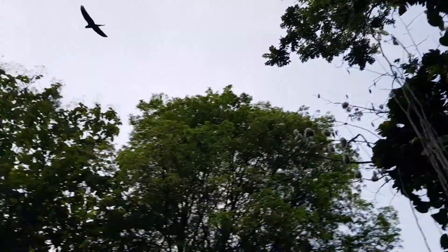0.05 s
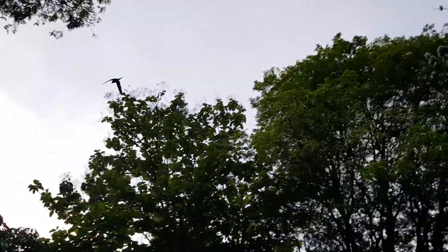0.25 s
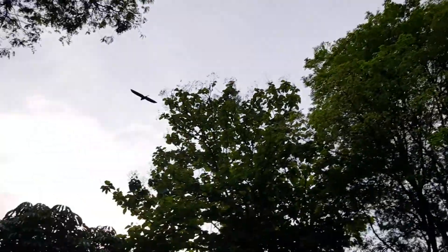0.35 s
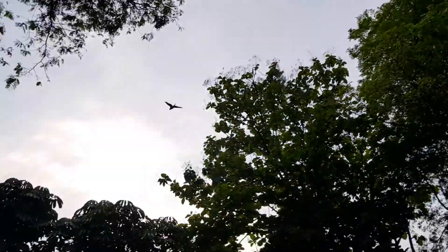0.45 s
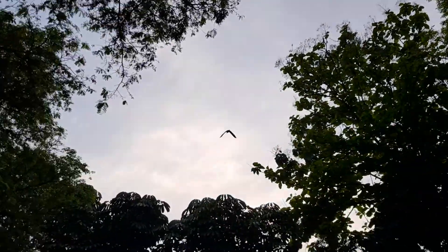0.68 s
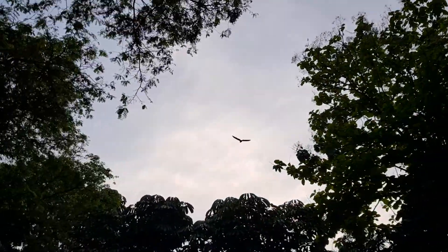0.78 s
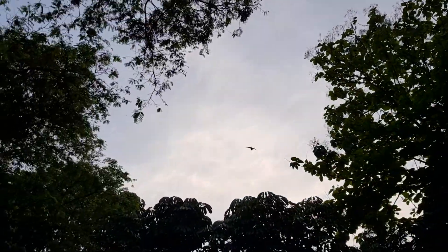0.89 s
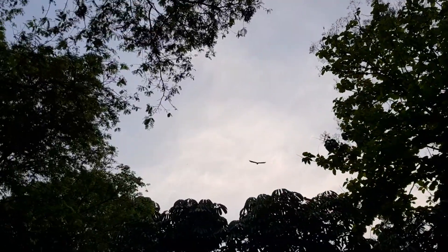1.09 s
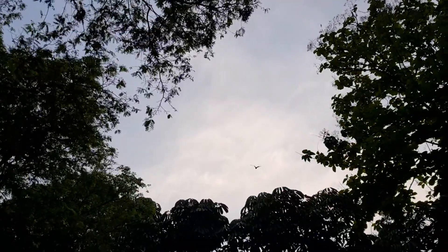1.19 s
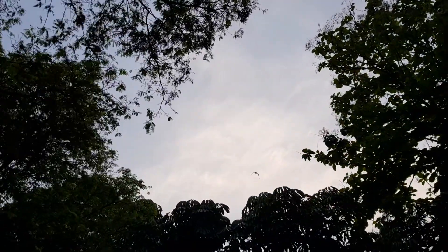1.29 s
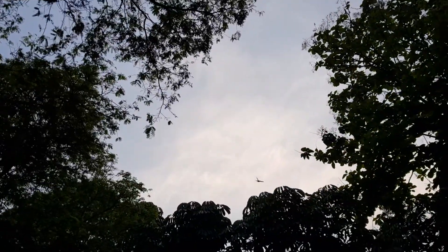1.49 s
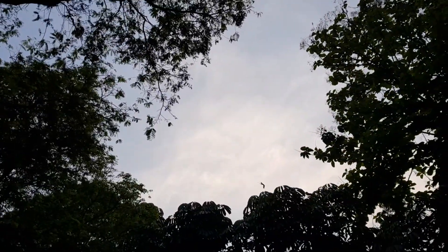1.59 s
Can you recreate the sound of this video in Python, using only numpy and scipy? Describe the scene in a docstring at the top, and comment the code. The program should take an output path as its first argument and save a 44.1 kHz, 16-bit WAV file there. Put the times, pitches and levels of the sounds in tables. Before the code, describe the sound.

A parrot gives one harsh, raspy squawk in flight, echoing off trees over a low drone.

```python
"""A parrot flying over a clearing gives one harsh squawk, a filtered harmonic voice scattered by the trees.
Its pitch arches up and down; in mid call the voice breaks into a fast flutter with side tones and rasp.
Behind it: a low motor-like drone of two sines, rumble and air of coloured noise, a buzzing insect of
rapid downward chirps, swells of noise hiss, faint far birds of blurred glides and two ticks of ringing modes."""
import sys
import numpy as np
from scipy import signal
from scipy.fft import rfft, irfft
from scipy.io import wavfile
from scipy.ndimage import uniform_filter1d

SR = 44100
rng = np.random.default_rng(int(sys.argv[2]) if len(sys.argv) > 2 else 0)


def pcm_store(signal):
    """Save signal as 16-bit PCM."""
    levels = np.round(np.clip(np.atleast_2d(signal), -1, 1) * 32767)
    wavfile.write(sys.argv[1], SR, levels.astype(np.int16).T)


N = 72765
TIME = np.arange(N) / SR  # s
BINS_HZ = np.fft.rfftfreq(N, 1 / SR)


def from_db(db):
    """Amplitude gain is ten to the power of a twentieth of the decibels."""
    return 10 ** (np.asarray(db) / 20)


def rms_one(x):
    """Normalisation by the root mean square gives unit effective amplitude."""
    return x / np.sqrt(np.mean(x ** 2) + 1e-20)


def in_time(rows):
    """Linear interpolation carries each column of a curve to every sample."""
    s, *columns = np.transpose(rows)
    return [np.interp(TIME, s, column) for column in columns]


def at_hz(points, hz, axis=1):
    """Interpolation of one spectrum column along log frequency."""
    table = np.array(points)
    return np.interp(np.log(hz + 1), np.log(table[:, 0]), table[:, axis])


def colour(x, points, axis=1):
    """Zero-phase filtering: each frequency is multiplied by a smooth gain curve."""
    return irfft(rfft(x) * from_db(at_hz(points, BINS_HZ, axis)), N)


def drift(hz):
    """Low-passed noise is a smooth random motion up to about this rate, of unit rms."""
    spectrum = rfft(rng.standard_normal(N))
    return rms_one(irfft(spectrum / (1 + (BINS_HZ / hz) ** 4), N))


def pan(db):
    """Intensity panning: left gains and right loses this many dB."""
    return from_db(np.array([[1], [-1]]) * db)


def turn(hz):
    """Phase is the time integral of angular frequency."""
    return 2 * np.pi * np.cumsum(hz) / SR


def blurred_tone(hz, width_hz):
    """Multipath fading through the leaves: random quadrature amplitudes, different in each ear."""
    phase = turn(hz)

    def one_ear():
        return rms_one(drift(width_hz) * np.cos(phase) + drift(width_hz) * np.sin(phase))

    return np.array([one_ear(), one_ear()])


def rumble_and_air():
    """Diffuse-field coherence: noise shares more between the ears where their likeness is higher."""
    # steady background spectrum: f/Hz, density/dB per Hz (relative)
    spectrum = [(20, -10), (38, -35), (52, 4), (70, 1), (110, -2), (180, -3), (280, -8.5), (420, -9.5),
                (650, -19), (1000, -24), (2000, -25.5), (3000, -32), (4500, -29.5), (7000, -33.5),
                (9500, -31.5), (11000, -87), (16000, -63)]
    # overall level: t/s, level/dB
    level = [(0, -49.5), (.8, -47), (1.65, -48.5)]
    # left-right correlation: f/Hz, likeness/1
    likeness = [(50, 0.88), (130, 1), (300, 0.63), (600, 0.26), (1200, .1), (4000, 0.026), (15000, 0.25)]
    alike = np.clip(at_hz(likeness, BINS_HZ), -1, 1)
    mid, side = rfft(rng.standard_normal((2, N)))
    common = np.sqrt(1 + alike) * mid
    opposed = np.sqrt(1 - alike) * side * [[1], [-1]]
    noise = irfft(common + opposed, N)
    return rms_one(colour(noise, spectrum)) * from_db(in_time(level)[0])


def drone():
    """Harmonic series: a wavering fundamental and its octave share one phase."""
    # distant drone: t/s, fundamental level/dB, octave level/dB
    levels = [(0, -45.5, -70), (.15, -51, -52.5), (.45, -45.5, -62.5), (.6, -49.5, -46), (.71, -50, -65),
              (.82, -52.5, -44.5), (1.02, -47.5, -64), (1.17, -51, -50.5), (1.43, -49, -45.5),
              (1.65, -43.5, -53)]
    phase = turn(51 * (1 + .02 * drift(10)))  # fundamental near 51 Hz
    tone = np.zeros(N)
    for harmonic, db in enumerate(in_time(levels), 1):
        amplitude = np.sqrt(2) * from_db(db + 0.55 * drift(36))  # a sine's peak from its rms
        tone += amplitude * np.sin(harmonic * phase)
    return tone * pan(0.7)


def insect():
    """Periodic frequency and amplitude modulation: rapid chirps, each sweeping down, fuse to a buzz."""
    # t/s, level/dB
    level = [(0, -61.5), (.3, -62.5), (.7, -59), (1.1, -60), (1.45, -59.5), (1.65, -59)]
    rate_hz, centre_hz, sweep_hz, width_hz, depth = 91, 8557, 950, 420, 0.3
    stroke = np.cumsum(rate_hz * (1 + 0.015 * drift(13))) / SR % 1  # position in the chirp, 0-1
    tone = blurred_tone(centre_hz + sweep_hz * (.5 - stroke), width_hz)
    chirps = tone * (1 - depth * np.cos(2 * np.pi * stroke))
    return rms_one(chirps) * from_db(in_time(level)[0]) * pan(3.5)


def hiss():
    """Coloured noise under a slow envelope: a soft high hiss swells and sinks, mostly on the left."""
    # t/s, level/dB, left minus right/dB
    swells = [(0, -62.5, 0), (.11, -57, 1), (.19, -58, 6), (.4, -43, 3.5), (.47, -46.5, -0.5), (.7, -63, 2),
              (.776, -60, 8), (.81, -63.5, 6), (.87, -60.5, 14), (.98, -55.5, 10.5), (1.26, -67.5, 2.5),
              (1.365, -63.5, 11), (1.5, -70, 6), (1.6, -73, -2)]
    # f/Hz, density/dB per Hz (relative)
    spectrum = [(1000, -38), (3000, 6.5), (5000, 5.5), (7000, 1.5), (11500, 7), (15500, 3.5)]
    db, balance_db = in_time(swells)
    noise = rms_one(colour(rng.standard_normal((2, N)), spectrum))
    return noise * from_db(db) * pan(balance_db / 2)


def far_birds():
    """Frequency glides under half-sine envelopes, blurred by distance into faint notes."""
    # onset t/s, length/s, mid pitch f/Hz, fall/Hz (negative rises), blur width/Hz,
    # level at mid note/dB, left gain and right loss/dB
    calls = [(0.085, 0.045, 5500, -300, 220, -59, 1.5), (1.06, .16, 3890, 200, 298, -64.5, 0.5),
             (1.394, 0.15, 2310, 141, 50, -65.5, -1), (1.482, .135, 4900, 200.5, 403, -65, -1)]
    out = np.zeros((2, N))
    for s, length, hz, fall_hz, width_hz, db, pan_db in calls:
        along = np.clip((TIME - s) / length, 0, 1)
        note = blurred_tone(hz + fall_hz * (.5 - along), width_hz)
        out += note * np.sin(np.pi * along) * from_db(db) * pan(pan_db)
    return out


def parrot():
    """Source and filter: rough pitch kicks split the harmonics into side tones, throat and beak shape them."""
    # the voice's pitch: t/s, f/Hz
    pitch_curve = [(.21, 550), (.226, 800), (.24, 935), (.256, 1100), (.275, 1110), (.303, 1045),
                   (.322, 1055), (.342, 1095), (.36, 1015), (.382, 1015), (.42, 993), (.47, 960),
                   (.49, 925), (.515, 890), (.54, 755)]
    # its effort: t/s, level/dB
    effort = [(.21, -39.5), (.226, -28.5), (.25, -29.5), (.265, -26), (.3, -27.5), (.335, -23),
              (.36, -25.5), (.385, -25.5), (.43, -25), (.46, -28), (.52, -29.5), (.537, -27.5)]
    # how far the voice breaks: t/s, roughness/1 (0-1)
    roughness = [(.21, .3), (.245, .25), (.262, .04), (.3, .12), (.325, .95), (.36, .75), (.38, 1),
                 (.47, .95), (.495, .25), (.52, .15), (.54, .3)]
    # throat and beak: f/Hz, gain with beak half open/dB, gain wide open/dB (relative)
    throat = [(506, 0, -31), (790, -19, -14), (895, -11, -11), (1125, -4, -8.5), (1300, -5, -3.5),
              (1470, -8, -5), (1840, -10, -0.5), (1830, -5.5, -2.5), (2470, 8, 3), (2930, -3, -9),
              (3100, 7, -0.5), (3380, 4, -4.5), (3580, -10.5, -5), (4580, 1, 0.5), (5110, -4.5, -9),
              (7090, -19, -18), (8180, -27, -30), (11000, -29, -35), (15000, -46, -39)]
    start_s, end_s, attack_s, release_s = 0.2057, 0.5304, 0.007, 0.012
    opening_s, opened_s = .28, .36  # the beak opens wide between these times
    flutter_hz, wander, sharpness, kick_spread_db = 146, .015, 4, .7
    # at full roughness: mean pitch lift, loss of amplitude per unit kick, random pitch share and level
    lift_hz, kick_dip, jitter, shimmer_db = 73, .25, .009, 1.8
    pitch, rough = in_time(pitch_curve)[0], in_time(roughness)[0]

    # flutter: raising the wave to a power narrows each kick
    flutter = (1 + np.sin(turn(flutter_hz * (1 + wander * drift(82))))) / 2
    kick = flutter ** sharpness * from_db(kick_spread_db * drift(100))
    jittered_hz = pitch * (1 + jitter * np.sqrt(rough) * drift(300))
    phase = turn(jittered_hz + rough * lift_hz * kick / kick.mean())

    pulses = rms_one(sum(np.cos(k * phase) for k in range(1, 15)))
    rasp = from_db(-23) * (1 + np.cos(phase)) * rng.standard_normal(N)  # noise pulsing at the pitch
    shimmer = from_db(shimmer_db * np.sqrt(rough) * drift(184))
    source = (pulses + rasp) * (1 - kick_dip * rough * kick) * shimmer

    opening = np.clip((TIME - opening_s) / (opened_s - opening_s), 0, 1)
    half_open = colour(source, throat, axis=1)
    wide_open = colour(source, throat, axis=2)
    voice = (1 - opening) * half_open + opening * wide_open
    # level out the short-term rms, so that effort alone sets the loudness
    voice = voice / np.sqrt(uniform_filter1d(voice ** 2, size=900) + 1e-12)
    attack = np.clip((TIME - start_s) / attack_s, 0, 1)
    release = np.clip(1 - (TIME - end_s) / release_s, 0, 1)
    return voice * attack * release * from_db(in_time(effort)[0])


def scattered_paths(t60, per_s):
    """Exponential reverberant decay of random clumped echoes, rising over about 20 ms, of unit energy."""
    arrives = rng.random((2, N)) < per_s / SR
    clumps = from_db(1.5 * drift(37))
    paths = rng.standard_normal((2, N)) * arrives * clumps
    paths = paths * from_db(-60 * TIME / t60) * (1 - np.exp(-TIME / .02))
    return paths / np.sqrt(np.sum(paths ** 2, axis=1, keepdims=True) + 1e-20)


def clearing(call):
    """Convolution with an impulse response: close, near and far echoes join the direct call."""
    # scatter from the trees: f/Hz, near foliage gain/dB, far trees gain/dB
    scatter = [(696, -10, -12), (1070, -11.5, -14), (2050, -0.5, -7), (3170, -6, -16), (4820, 0, -12),
               (6900, -2, -10), (14000, -4, -33)]
    # the bird flies in from the right: t/s, lead of the right side/s
    right_lead = [(.22, .000132), (.39, .000108), (.53, .000068)]
    # how the two sides hear the call: f/Hz, left minus right/dB
    ear_balance = [(1100, -.5), (2200, -0.5), (3200, 2.5), (4300, -3), (6000, 0.5), (9000, 7.5)]
    echoes_per_s, return_delay_s = 1500, .35
    near = colour(scattered_paths(0.35, echoes_per_s), scatter, axis=1)
    far = colour(scattered_paths(1, echoes_per_s), scatter, axis=2)

    # late return from the far edge of the clearing
    edge = colour(scattered_paths(1, echoes_per_s), scatter, axis=2)
    late = np.array([np.interp(TIME - return_delay_s, TIME, side, left=0) for side in edge])

    # reflections from right around the listener, one path at every sample
    close = scattered_paths(0.019, SR)
    response = near + far + from_db(-21) * late + from_db(-5) * close
    echoes = signal.fftconvolve(call[None], response, axes=1)[:, :N]

    right = np.interp(TIME + in_time(right_lead)[0], TIME, call)
    direct = np.array([call, right])
    heard = direct * pan(-.5) + echoes * pan(-1.47)
    return irfft(rfft(heard) * pan(at_hz(ear_balance, BINS_HZ) / 2), N)


def ticks():
    """Modal ringing: two light taps excite the same short damped modes."""
    # t/s, level/dB
    taps = [(1.3862, -40.5), (1.513, -49)]
    # f/Hz, level relative to the tap/dB, 60 dB decay time/s
    modes = [(1613, -7.5, 0.028), (1893, 0, 0.02), (2760, -17.5, 0.041)]
    contact_s = 0.00047  # time constant of the onset
    out = np.zeros(N)
    for s, db in taps:
        age = np.maximum(TIME - s, 0)
        onset = 1 - np.exp(-age / contact_s)
        for hz, mode_db, t60 in modes:
            decay = from_db(db + mode_db - 60 * age / t60)
            out += onset * decay * np.sin(2 * np.pi * hz * age)
    return out * pan(-8)


def scene():
    """Superposition: the squawk among the trees adds to the quiet surroundings."""
    surroundings = rumble_and_air() + drone() + insect() + hiss() + far_birds()
    return surroundings + clearing(parrot()) + ticks()


def record(dry):
    """Low-pass filtering: a 100 Hz wide slope cuts the top steeply."""
    cutoff_hz = 15750
    passed = np.clip((cutoff_hz - BINS_HZ) / 100 + .5, 0, 1)
    return irfft(rfft(dry) * passed, N)


dry = scene()
out = record(dry)
pcm_store(out)
```